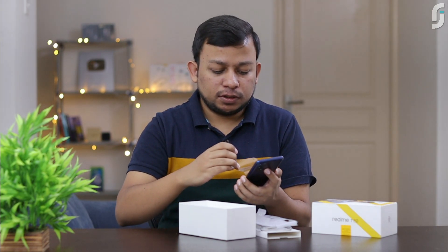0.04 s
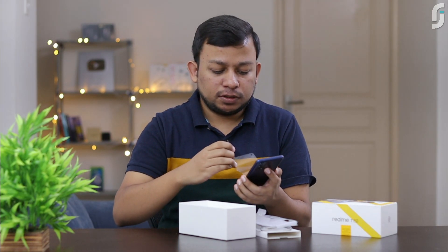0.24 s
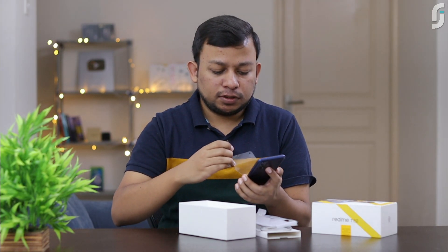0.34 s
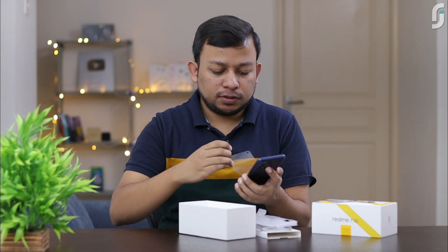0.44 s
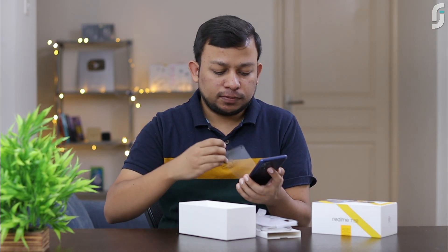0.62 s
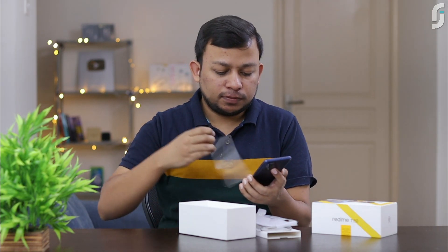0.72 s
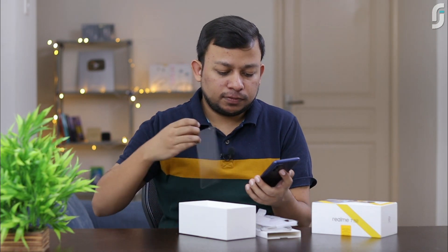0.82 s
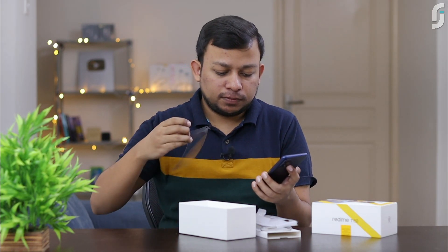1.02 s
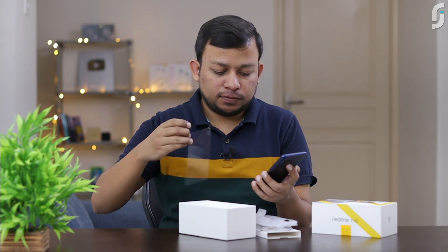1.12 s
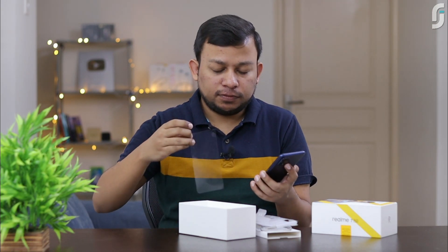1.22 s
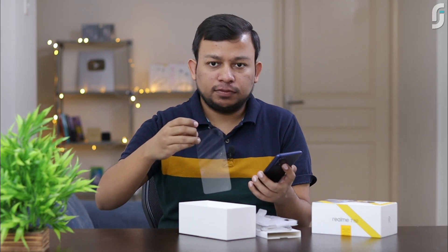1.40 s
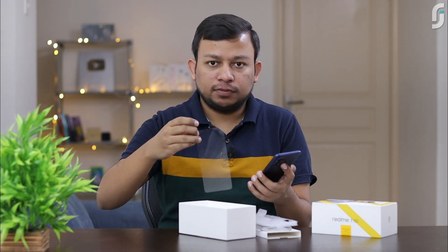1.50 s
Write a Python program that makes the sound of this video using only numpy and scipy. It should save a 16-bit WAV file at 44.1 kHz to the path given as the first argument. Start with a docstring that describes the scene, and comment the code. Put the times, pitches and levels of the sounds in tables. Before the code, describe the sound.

Bright snapping crackle of a plastic film pulled from a phone, quickening, then a faint rustle.

```python
"""A stiff plastic film is pulled off a phone screen: the glue lets go in jerks that mostly come faster and faster.
Each jerk is a bright crack of noise, a shudder of tiny slips ringing the film, and a soft late thump.
Then the freed film flaps and rustles, made of noise with an uneven level.
The table and walls of a small furnished room answer with echoes and a fading tail.
A noise suppressor turns down the faint end of the tail; a faint low hum remains."""
import sys
import numpy as np
from scipy import signal
from scipy.fft import rfft, irfft
from scipy.io import wavfile
from scipy.ndimage import uniform_filter1d

SR = 44100
rng = np.random.default_rng(int(sys.argv[2]) if len(sys.argv) > 2 else 0)


def wrap_up_sound(samples):
    """Save the sound to the file named by the first command line argument, as 16-bit audio."""
    columns = np.atleast_2d(samples).T
    # keep every value between -1 and 1, then stretch to whole-number steps
    tamed = np.clip(columns, -1, 1)
    steps = np.round(tamed * 32767).astype(np.int16)
    wavfile.write(sys.argv[1], SR, steps)


N = 68355  # samples, about 1.55 s


def undb(db):
    """Turn decibels into an amplitude factor."""
    return 10 ** (np.asarray(db) / 20)


def unit(x):
    """Scale a sound to an rms of 1."""
    return x / np.sqrt(np.mean(x ** 2))


def above(x, hz):
    """Keep what lies above hz (high-pass filter)."""
    return signal.sosfilt(signal.butter(2, hz, "high", fs=SR, output="sos"), x)


def coloured(points, size):
    """Noise of rms 1 whose spectrum passes through points of (pitch_hz, level_db)."""
    hz, db = np.array(points).T
    log_hz = np.log(np.maximum(np.fft.rfftfreq(size, 1 / SR), 1))
    gain = undb(np.interp(log_hz, np.log(hz), db))
    return unit(irfft(rfft(rng.standard_normal(size)) * gain, size))


def ring(x, hz, t60):
    """One mode driven by x, dying by 60 dB in t60 seconds; noise comes out with about the same power."""
    r = np.exp(-np.log(1000) / (t60 * SR))
    w = 2 * np.pi * hz / SR
    return signal.lfilter([2 * np.sin(w) * np.sqrt(1 - r)], [1, -2 * r * np.cos(w), r * r], x)


# Spectrum of the steady hum and hiss: pitch_hz [Hz], level_db [dB]
HUM_SPECTRUM = [(20, -29), (32, -14), (50, 0), (75, -12), (120, -11.5), (160, -3.5), (210, -7),
                (320, -16.5), (800, -23.5), (1100, -27), (1400, -23), (1800, -35), (2250, -28),
                (2900, -43.5), (3700, -45), (4000, -38), (4300, -47), (16000, -52)]
HUM_DB = -63.5  # rms level


def hum():
    """Steady noise, strongest in the bass, with a weak hiss above."""
    return undb(HUM_DB) * coloured(HUM_SPECTRUM, size=N)


# Near echoes from small hard surfaces: delay_s [s], level_db [dB]
NEAR_ECHOES = [(.0052, -16), (.0132, -17), (.0173, -16), (.0225, -21), (.029, -22)]
# Bands of the room's tail: pitch_hz [Hz], level_db [dB], t60_s [s] (time to fade by 60 dB)
ROOM_BANDS = [(125, -11.5, .25), (250, -9.5, .2), (500, -5.5, .18), (800, -9, 0.56), (1150, -5.5, .4),
              (1580, -6, 0.4), (1900, -10, 0.7), (2420, -8.5, .8), (3050, -11.5, 0.79), (4600, -12, 0.79),
              (6500, -14, 0.78), (8850, -15.5, 0.74), (11900, -11.5, 0.55), (15500, -12, .5)]
ROOM_BUILD_S = 0.0027
EARLY_DB, EARLY_T60_S = -0.5, 0.084  # an extra, faster fade in every band
ECHO_LOW_HZ = 10000  # small hard surfaces return only the treble
SIDES = 3  # parts of the room, each sent its own crackle


def room(side):
    """Response of one part of the room: near echoes, and a tail whose bands fade at their own rates."""
    t = np.arange(SR) / SR
    noise = rfft(rng.standard_normal(SR))
    log_hz = np.log(np.arange(SR // 2 + 1) + 1.)
    centres = np.log(np.array(ROOM_BANDS)[:, 0])
    tail = 0
    for k, (hz, db, t60) in enumerate(ROOM_BANDS):
        # each band blends into its neighbours
        weight = np.interp(log_hz, centres, np.arange(len(ROOM_BANDS)) == k)
        band = irfft(noise * weight, SR)
        fade = undb(-60 * t / t60) + undb(EARLY_DB - 60 * t / EARLY_T60_S)
        tail = tail + band * fade * undb(db) / np.sqrt(SIDES * SR / 20)
    build_up = 1 - np.exp(-(t / ROOM_BUILD_S) ** 2)

    echoes = np.zeros(SR)
    for delay, db in NEAR_ECHOES[side::SIDES]:  # the echoes are shared out among the sides
        echoes[int(delay * SR)] = undb(db)
    return tail * build_up + above(echoes, ECHO_LOW_HZ)


# Loudness of the rustle over time: time_s [s], level_db [dB]
RUSTLE_LOUDNESS = [(0.768, -80), (0.799, -38.5), (0.832, -46.5), (.875, -48.5), (0.896, -42.5),
                   (.91, -49.5), (0.929, -60), (.96, -61.5)]
# Spectrum of the rustle: pitch_hz [Hz], level_db [dB]
RUSTLE_SPECTRUM = [(100, -12.5), (300, 0), (620, 8), (1200, 3.5), (2500, -2.5), (6000, -31)]
FLICKER_DB = 4  # typical size of the random level swings


def rustle(t):
    """The freed film flaps: soft crinkling noise whose level wavers at random."""
    time, db = np.array(RUSTLE_LOUDNESS).T
    steps = np.repeat(rng.standard_normal(len(t) // 128 + 1), 128)
    flicker = uniform_filter1d(steps, size=128)[:len(t)]  # steps become slopes
    level = np.interp(t, time, db, left=-120, right=-120) + FLICKER_DB * flicker
    return coloured(RUSTLE_SPECTRUM, size=len(t)) * undb(level)


# Modes of the thump: pitch_hz [Hz], level_db [dB], t60_s [s]
THUMP_MODES = [(99.5, -4, .05), (150, -4, 0.033), (228.5, -1, 0.038), (354, -3.5, 0.029), (500, 0.5, 0.053),
               (760, 0.5, .015)]
THUMP_LATE_S, PUSH_S = .0008, .0022  # wait before the push; time the push takes to peak
PUSH_HZ = 222  # modes below this are pushed more slowly
THUMP_FOCUS_DB = 8  # extra level of a mode at the thump's pitch
FOCUS_OCT, DETUNE = 0.31, 0.093  # width of the focus in octaves; random detuning as a fraction (also for the shudder)


def thump(t, pitch):
    """A soft late push of noise rings low modes; those near the given pitch are louder."""
    sound = 0
    for (f, db, t60), bend in zip(THUMP_MODES, rng.standard_normal(len(THUMP_MODES))):
        late = np.maximum(t - THUMP_LATE_S, 0) / (PUSH_S * max(PUSH_HZ / f, 1))
        push = late * np.exp(1 - late) * rng.standard_normal(len(t))
        focus = THUMP_FOCUS_DB * np.exp(-(np.log2(f / pitch) / FOCUS_OCT) ** 2)
        sound = sound + undb(db + focus) * unit(ring(push, f * (1 + DETUNE * bend), t60))
    return sound


# Modes of the film: pitch_hz [Hz], level_db [dB], t60_s [s]
FILM_MODES = [(1050, -15.5, 0.0027), (1674, -6, 0.027), (2032, 4, 0.026), (2500, 0.5, 0.01),
              (3500, 1.5, .005), (4450, 5, 0.014), (5100, 3, 0.0017), (6310, -0.5, .004), (7830, 4.5, .003),
              (10100, -8.5, .003), (12500, -5.5, .002)]
FOCUS_DB = 2.5  # extra level of a mode at the shudder's pitch
SLIP_SPREAD_DB = 2.5  # mean of the random boosts that make the slips uneven
SHUDDER_RISE_S, SHUDDER_FALL_S = 0.0006, .004
TREBLE_FIRST = 0.86  # how strongly modes above the shudder's pitch are hurried


def shudder(t, length, pitch):
    """Uneven tiny slips drive the film's modes; the driving of the treble dies first."""
    boost = SLIP_SPREAD_DB * rng.exponential(size=len(t))
    slips = unit(rng.standard_normal(len(t)) * undb(boost))
    rise = 1 - np.exp(-t / SHUDDER_RISE_S)
    sound = 0
    for (f, db, t60), bend in zip(FILM_MODES, rng.standard_normal(len(FILM_MODES))):
        haste = max(f / pitch, 1) ** TREBLE_FIRST
        fall = np.exp(-np.maximum(t * haste - length, 0) / SHUDDER_FALL_S)
        focus = FOCUS_DB * np.exp(-(np.log2(f / pitch) / FOCUS_OCT) ** 2)
        sound = sound + undb(db + focus) * ring(slips * fall * rise, f * (1 + DETUNE * bend), t60)
    return sound


# Spectrum of the crack: pitch_hz [Hz], level_db [dB]
CRACK_SPECTRUM = [(180, -43), (300, -21.5), (1480, -2.5), (2700, -5.5), (4690, 1.5), (6450, 2), (12600, -2),
                  (16500, -4)]
CRACK_RISE_S, CRACK_FALL_S = 0.00039, .0004


def crack(t):
    """The glue lets go: a very short burst of bright noise."""
    burst = coloured(CRACK_SPECTRUM, size=len(t))
    return burst * (1 - np.exp(-t / CRACK_RISE_S)) * np.exp(-t / CRACK_FALL_S)


CRACK_SPAN_S, BODY_SPAN_S = .00125, .005  # each part's energy is counted as rms over these times
CRACK_LOW_HZ, BASS_CUT_HZ = 880, 120


def sized(x, db, span):
    """Scale a short sound so its whole energy, spread over span seconds, has an rms of db."""
    return undb(db) * x / np.sqrt(np.sum(x ** 2) / (span * SR))


def jerk(crack_db, shudder_db, length, shudder_hz, thump_db, thump_hz):
    """One jerk of the glue line: crack, shudder and thump, set to level and then high-passed."""
    t = np.arange(4096) / SR
    cracking = sized(crack(t), crack_db, CRACK_SPAN_S)
    shuddering = sized(shudder(t, length, shudder_hz), shudder_db, BODY_SPAN_S)
    thumping = sized(thump(t, thump_hz), thump_db, BODY_SPAN_S)
    return above(cracking + shuddering, CRACK_LOW_HZ) + above(thumping, BASS_CUT_HZ)


# Jerks of the glue line: start_s [s], crack_db [dB], shudder_db [dB], shudder_length_s [s],
# shudder_pitch_hz [Hz], thump_db [dB], thump_pitch_hz [Hz]
GLUE_JERKS = [(0.2404, -12, -20, .005, 1640, -33, 500), (0.3163, -10, -14.5, .006, 4500, -30.5, 260),
              (.3868, -10.5, -20, .005, 4500, -31, 230), (0.5105, -11.5, -18.5, .007, 2950, -30.5, 200),
              (0.5927, -13.5, -15.5, .007, 5753, -31, 230), (0.6439, -11.5, -20.5, .006, 4000, -30.5, 200),
              (0.6843, -12, -18.5, .007, 3500, -28, 200), (.709, -11, -17, .009, 4800, -27.5, 250),
              (0.7292, -11.5, -20, .008, 2200, -27, 300), (.7417, -12, -19, .008, 5700, -29, 200),
              (0.754, -13.5, -23, .004, 2200, -30, 160), (.7614, -15.5, -15.5, .0025, 5400, -29.5, 150),
              (0.7654, -26, -17.5, .0045, 4900, -31.5, 120), (0.789, -48, -41.5, .004, 1900, -41, 150),
              (0.8024, -43, -24, .002, 2000, -44, 303.3), (0.8092, -44.5, -32.5, 0.0037, 2500, -44, 400)]
# One jerk just before the start, still ringing; same columns
# (its negative length means the shudder is already fading)
EARLIER_JERK = (-.012, -8, -16.5, -0.03, 1149.5, -32, 400)


def film(t):
    """The peeling film as sent in one direction: all the jerks plus the rustle."""
    sound = above(rustle(t), BASS_CUT_HZ)
    for start, *settings in GLUE_JERKS + [EARLIER_JERK]:
        one_jerk = jerk(*settings)
        i = int((start - t[0]) * SR)
        sound[i:i + len(one_jerk)] += one_jerk
    return sound


def scene():
    """The film heard directly, plus a different crackle of it sent into each part of the room."""
    lead = 4410  # samples of run-up, so the earlier jerk can ring into the start
    t = (np.arange(N + lead) - lead) / SR
    heard = film(t)
    for side in range(SIDES):
        heard = heard + signal.fftconvolve(film(t), room(side))[:len(t)]
    return heard[None, lead:]


GATE_DB, GATE_DEPTH_DB = -83.5, -15  # power per bin at which the suppressor is half closed; full cut


def suppress(x):
    """Noise suppressor: turn down each patch of time and pitch whose smoothed power is very faint."""
    z = signal.stft(x, nperseg=512, noverlap=384)[2]
    power = uniform_filter1d(abs(z) ** 2, size=9, axis=1)  # smooth over pitch
    power = uniform_filter1d(power, size=5, axis=2)  # smooth over time
    opened = power ** 2 / (power ** 2 + undb(GATE_DB) ** 4)
    return signal.istft(z * undb(GATE_DEPTH_DB * (1 - opened)), nperseg=512, noverlap=384)[1][:, :N]


CEILING = 1.05  # the loudest peaks are rounded towards this amplitude
TOP_HZ = 16000


def record(dry):
    """Suppress the faintest sound, add the hum, round off the peaks and cut the top."""
    mixed = suppress(dry) + hum()
    rounded = mixed / (1 + (mixed / CEILING) ** 4) ** .25
    return signal.sosfilt(signal.ellip(8, .2, 80, TOP_HZ, fs=SR, output="sos"), rounded)


dry = scene()
out = record(dry)
wrap_up_sound(out)
```